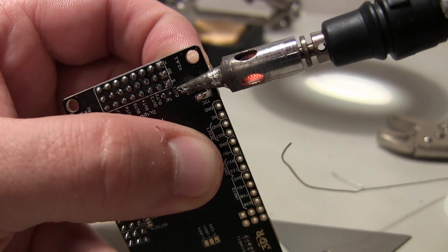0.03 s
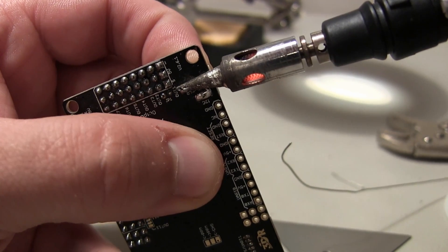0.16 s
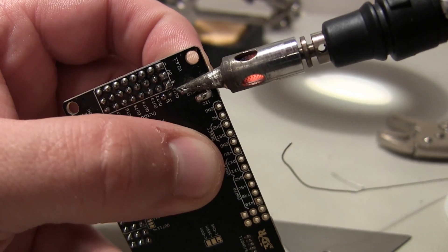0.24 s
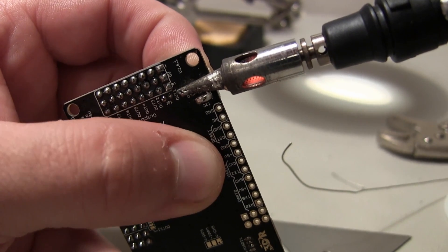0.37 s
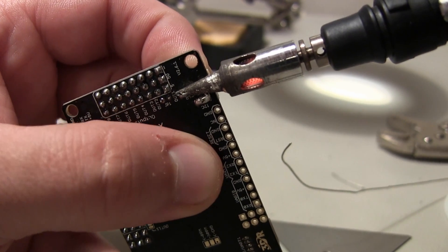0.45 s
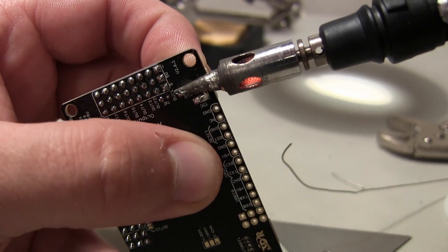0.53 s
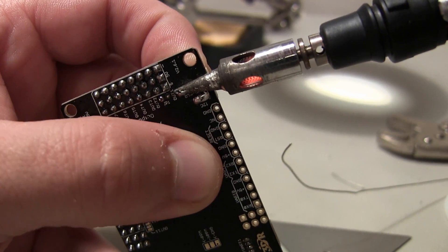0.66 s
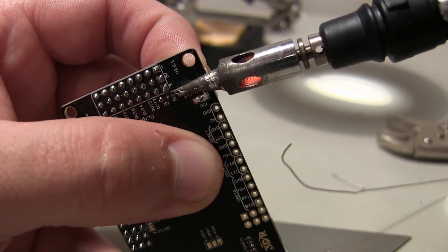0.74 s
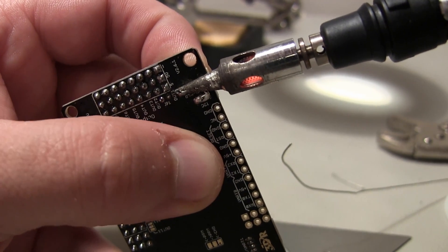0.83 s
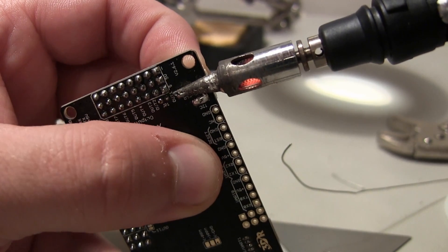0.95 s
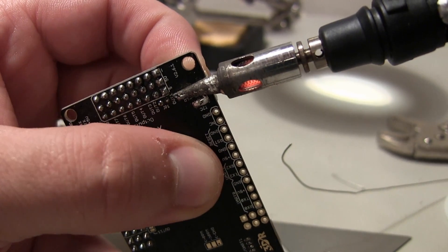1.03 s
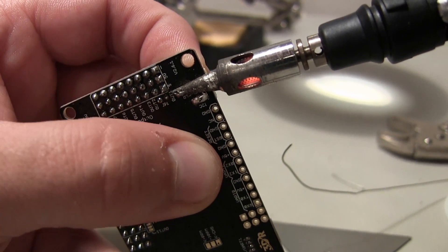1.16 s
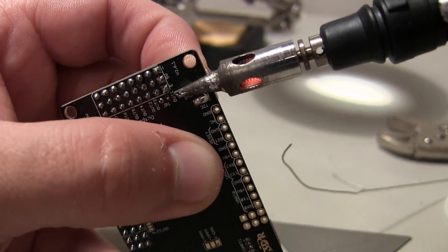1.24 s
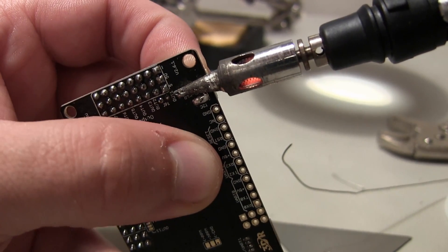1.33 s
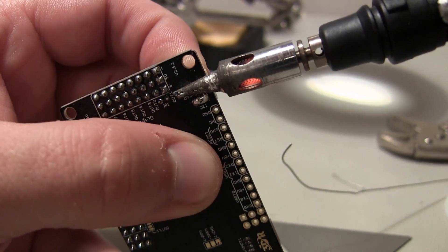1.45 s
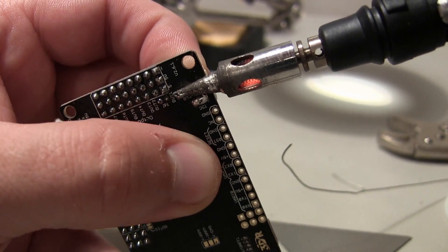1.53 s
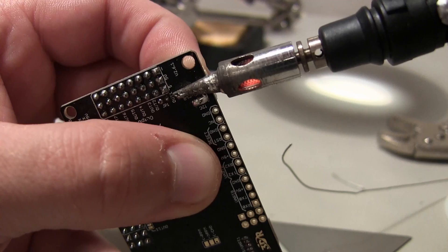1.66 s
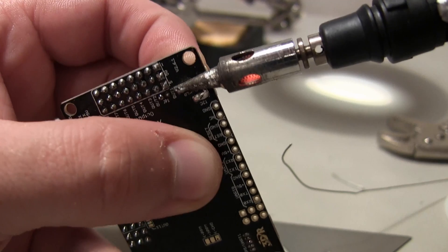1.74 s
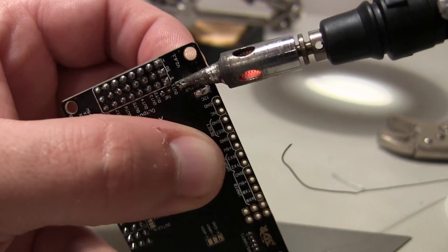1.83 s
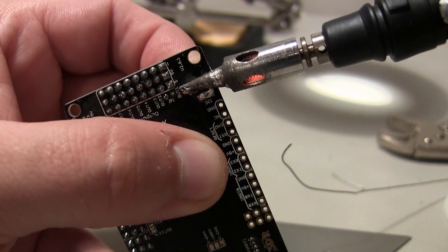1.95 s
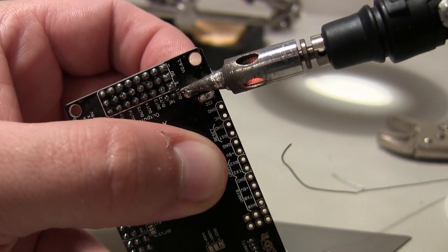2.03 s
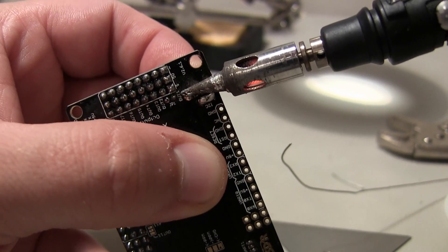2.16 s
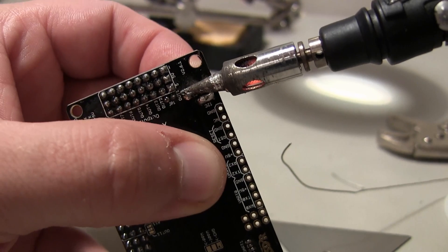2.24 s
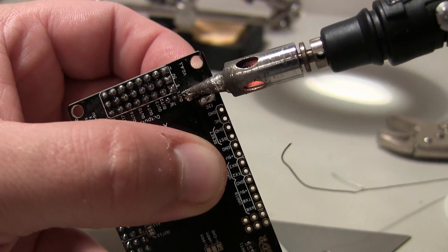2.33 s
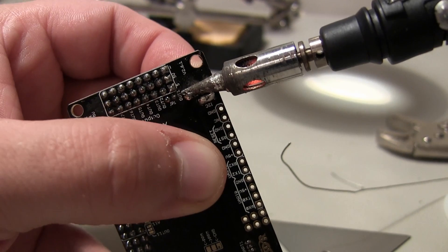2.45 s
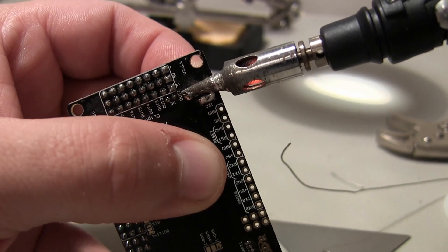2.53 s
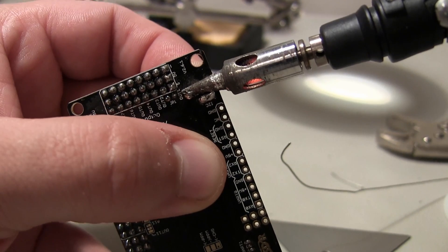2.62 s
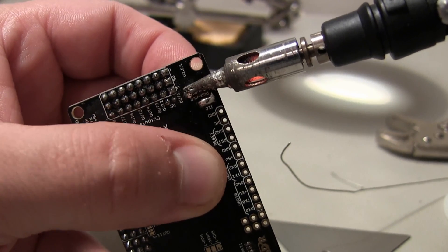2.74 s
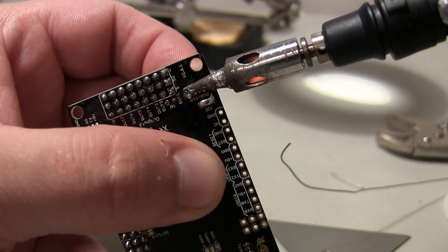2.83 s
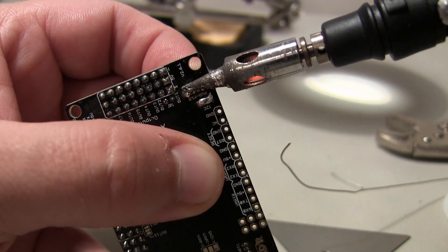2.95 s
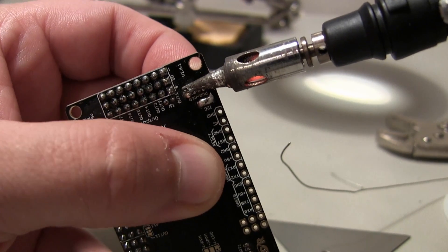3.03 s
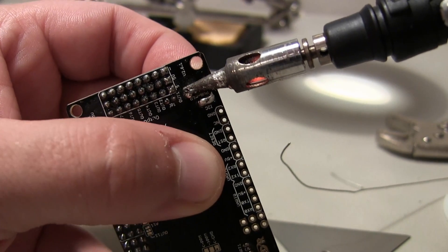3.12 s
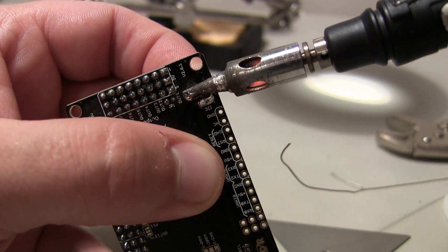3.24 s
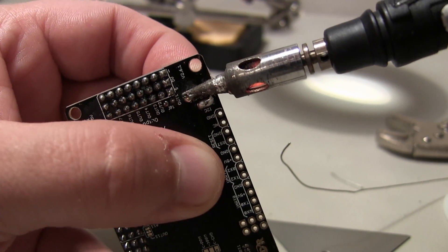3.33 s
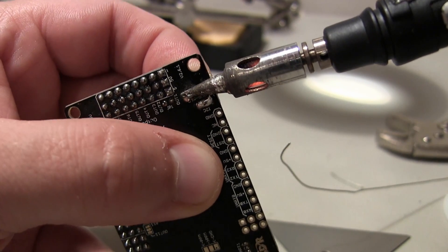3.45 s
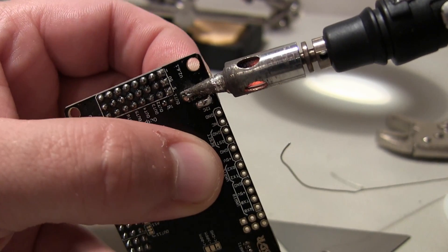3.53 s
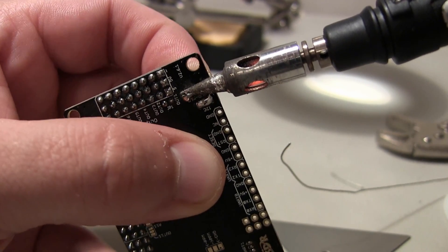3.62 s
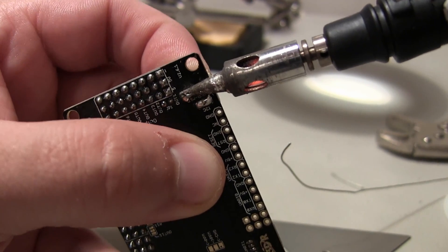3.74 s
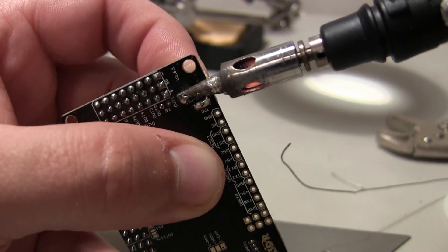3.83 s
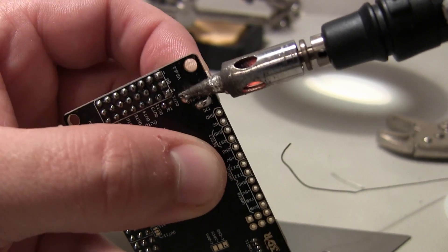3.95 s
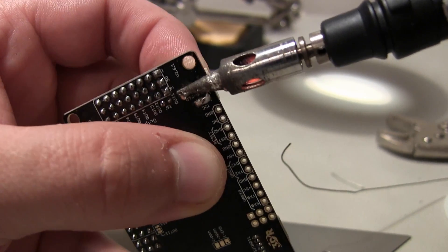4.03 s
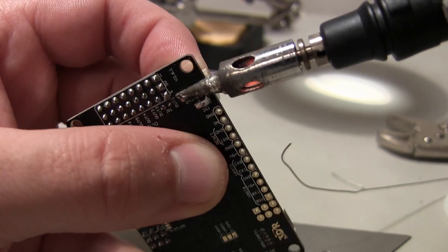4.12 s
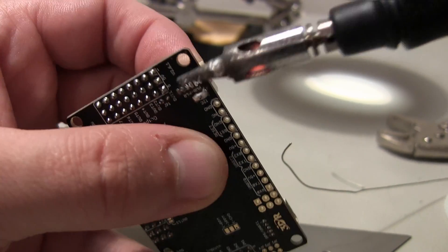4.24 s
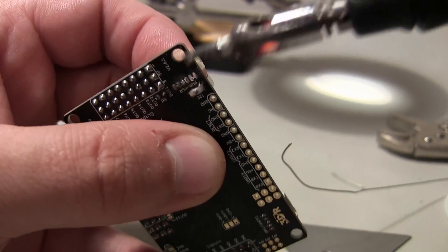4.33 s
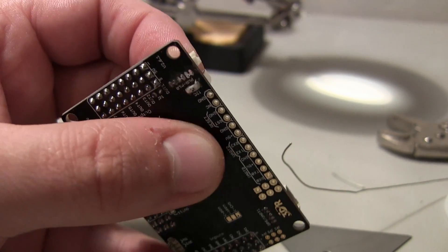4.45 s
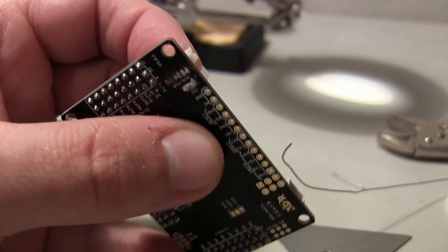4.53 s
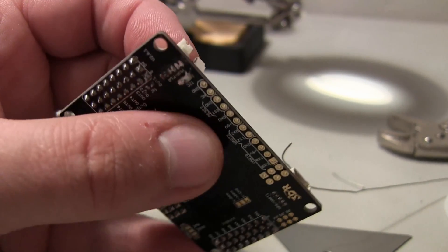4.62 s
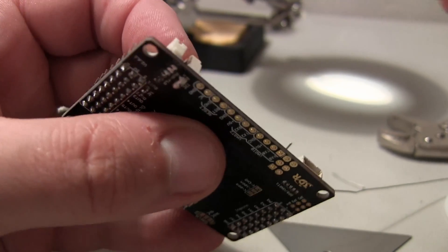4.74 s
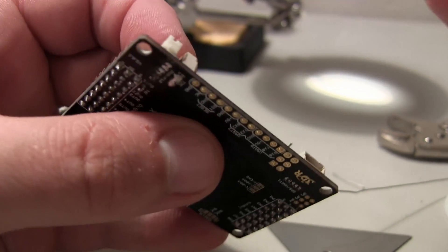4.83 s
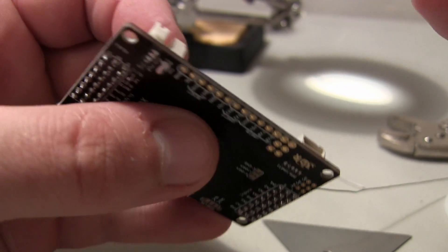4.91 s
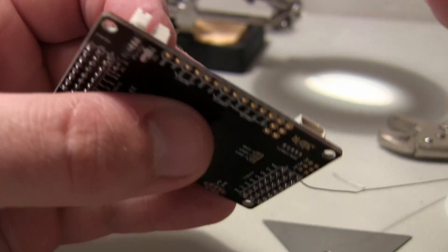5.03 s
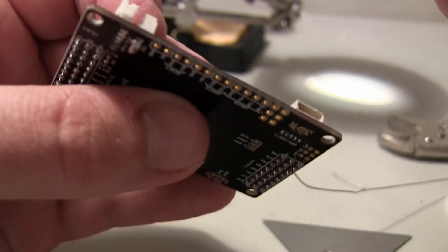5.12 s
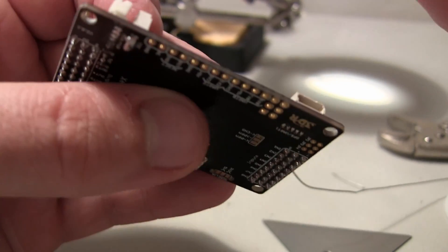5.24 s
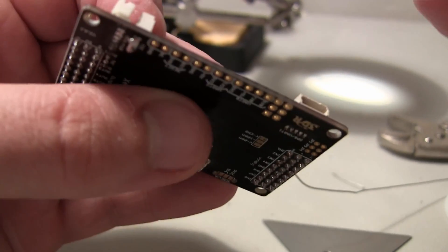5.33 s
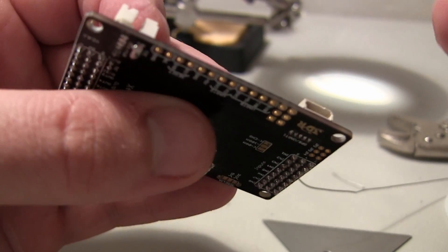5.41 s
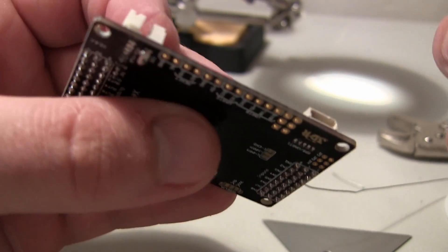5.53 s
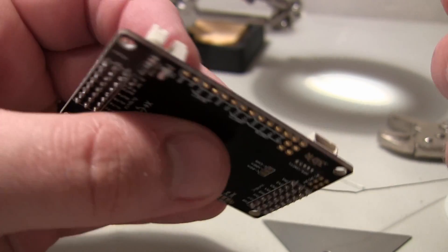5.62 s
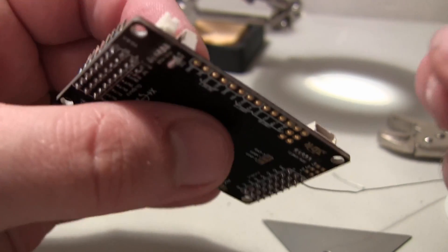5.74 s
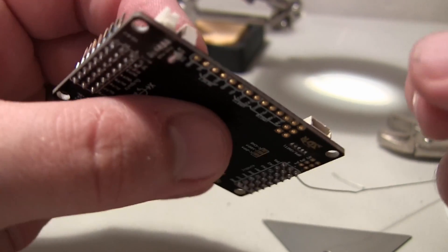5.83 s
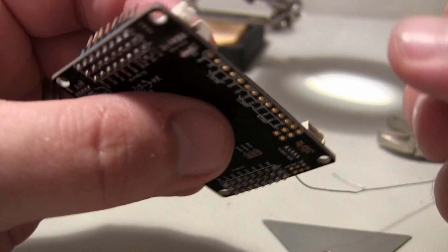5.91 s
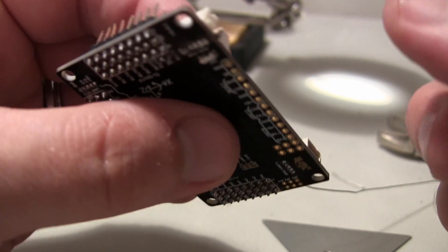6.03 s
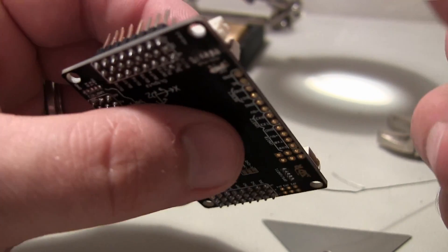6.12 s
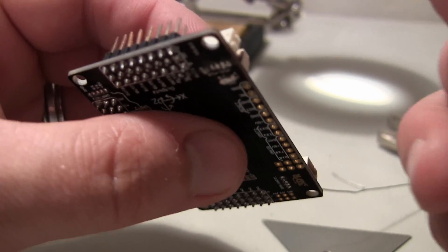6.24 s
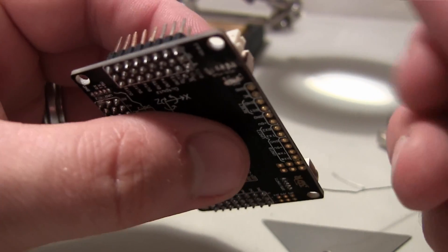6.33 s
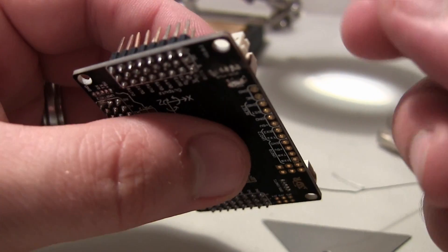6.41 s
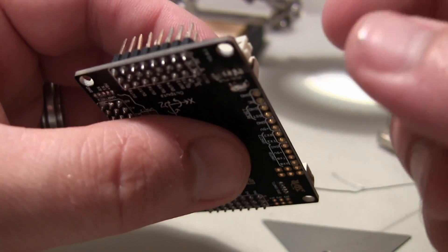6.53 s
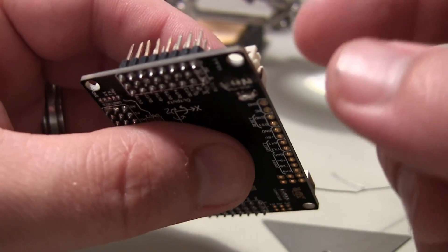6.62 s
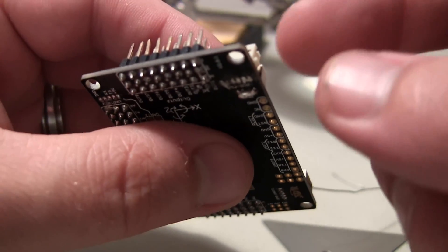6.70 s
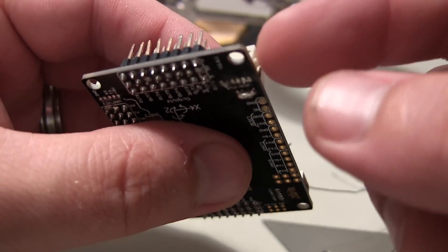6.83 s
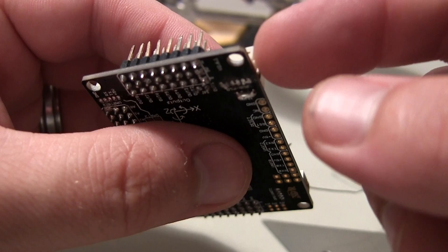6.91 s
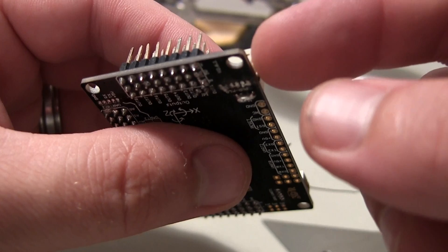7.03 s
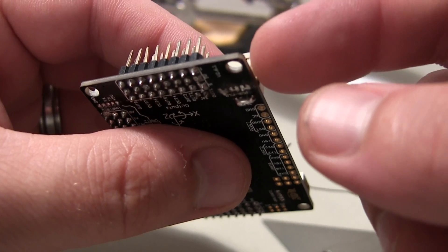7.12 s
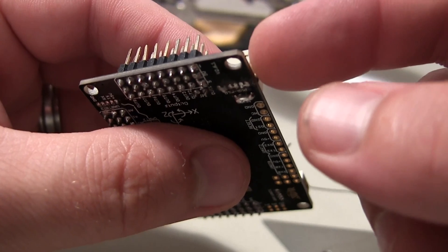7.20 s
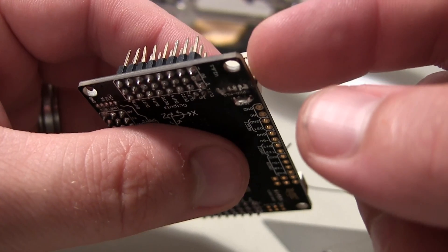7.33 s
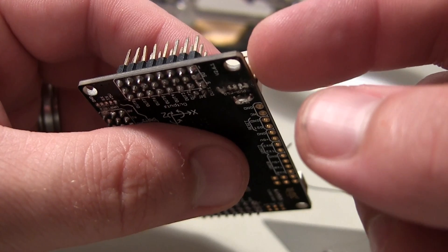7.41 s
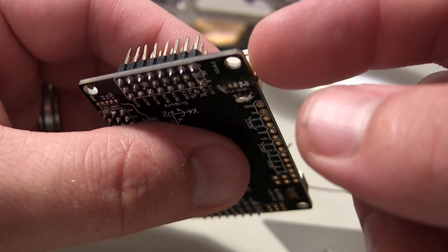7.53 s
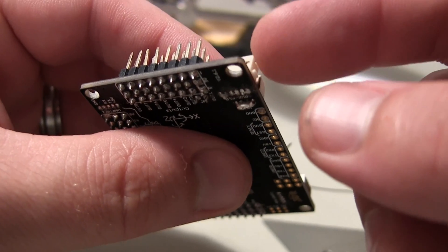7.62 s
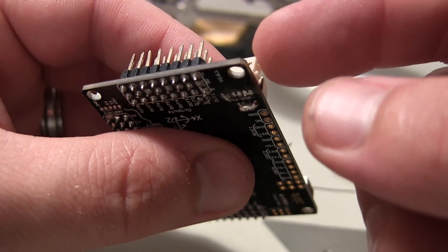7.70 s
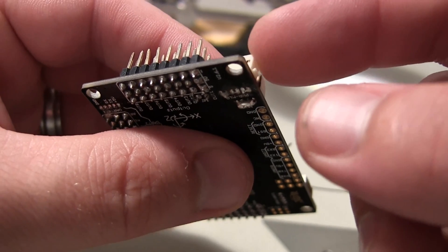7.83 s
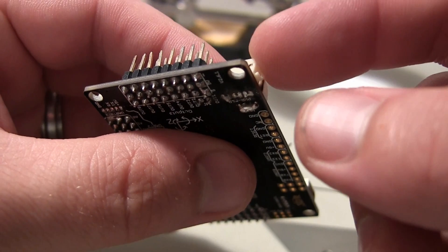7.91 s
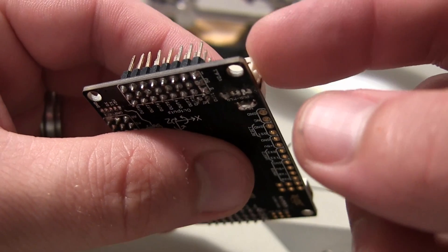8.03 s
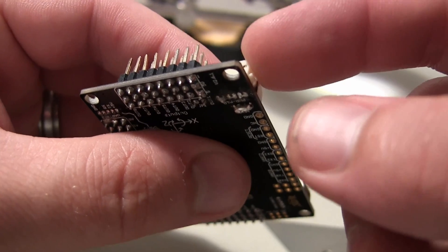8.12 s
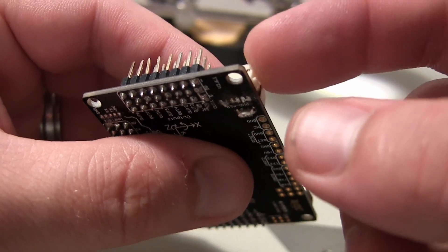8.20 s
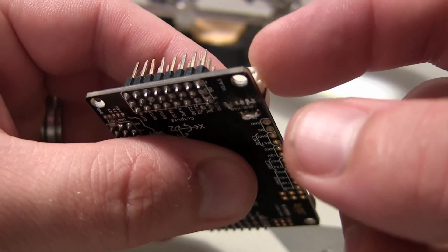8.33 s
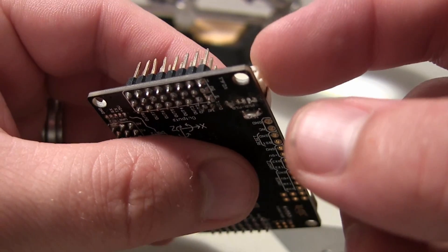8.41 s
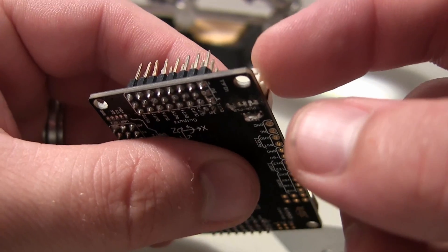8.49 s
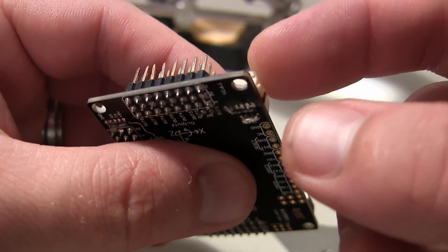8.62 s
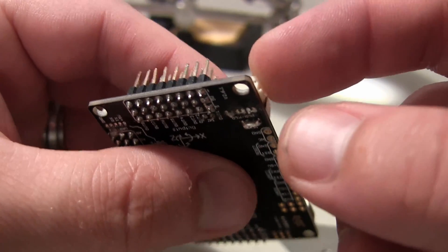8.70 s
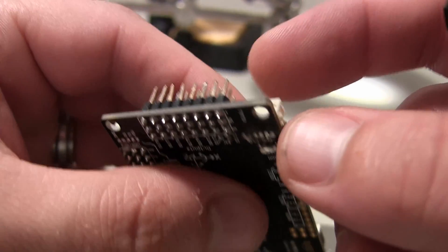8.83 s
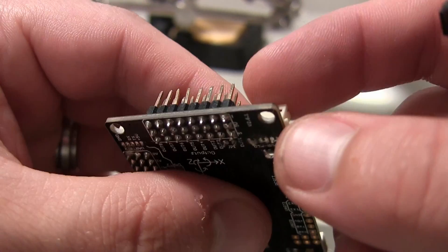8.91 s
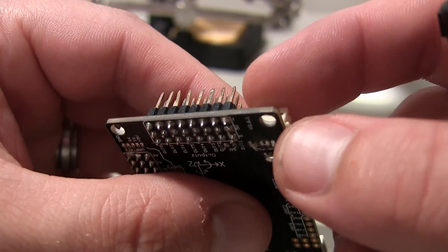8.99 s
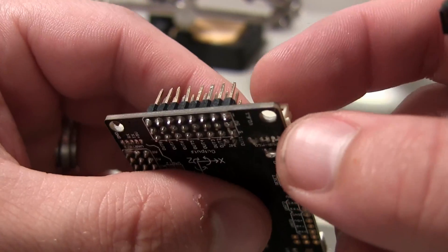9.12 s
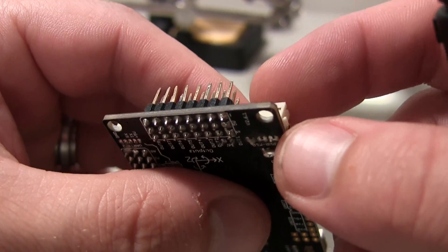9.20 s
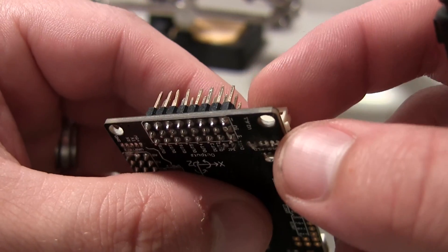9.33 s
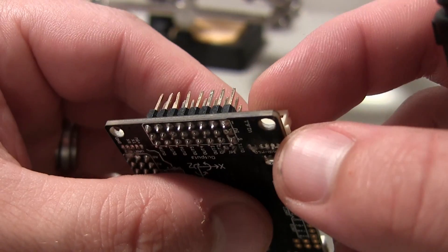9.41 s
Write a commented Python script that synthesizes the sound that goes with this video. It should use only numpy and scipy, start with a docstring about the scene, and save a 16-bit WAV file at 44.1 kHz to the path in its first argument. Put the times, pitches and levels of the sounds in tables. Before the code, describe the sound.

A gas soldering iron hisses steadily up close, then softens, with a few light clicks over a faint fan and electrical hum.

```python
"""Gas soldering iron at a bench

A gas jet hisses close by, coloured by the burner head's resonances and by echoes off nearby surfaces.
The iron heats a joint on a circuit board, is drawn away and is set down with a few light clicks; it
hisses on while fingers handle the board. A fan and mains hum fill the room; the hum swells near the end."""
import sys
import numpy as np
from scipy import signal
from scipy.fft import rfft, irfft, next_fast_len
from scipy.io import wavfile
from scipy.ndimage import map_coordinates

SR = 44100
rng = np.random.default_rng(int(sys.argv[2]) if len(sys.argv) > 2 else 0)


def store_wav(level_fs):
    """Save 16-bit WAV to argv[1]."""
    pcm = np.round(np.clip(np.atleast_2d(level_fs), -1, 1) * 32767)
    wavfile.write(sys.argv[1], SR, pcm.T.astype(np.int16))


N = 417186

# the iron is lifted off the joint, turned away and laid on the bench: (start [s], duration [s])
LIFT, TURN, LAY = (4.19, 0.45), (4.67, .2), (6.25, .58)


def amp(db):
    """The amplitude ratio of a level in decibels."""
    return 10 ** (np.asarray(db) / 20)


def unit(x):
    """Normalisation to an rms of 1."""
    return x / np.sqrt(np.mean(x ** 2) + 1e-20)


def along(points, hz):
    """A spectrum interpolated on a logarithmic frequency axis."""
    point_hz, point_db = np.transpose(points)
    return np.interp(np.log(hz + 1), np.log(point_hz + 1), point_db)


def humps(modes, hz):
    """Resonance: each mode adds a Lorentzian peak or dip, in dB."""
    return sum(db / (1 + (2 * (hz - centre) / width) ** 2) for centre, width, db in modes)


def wobble(rate):
    """Random modulation: a spline through rate knots a second."""
    return map_coordinates(rng.standard_normal(int(N * rate / SR) + 4), [np.arange(N) * rate / SR])


def filtered(x, response):
    """Linear filtering: the spectrum times a frequency response."""
    size = next_fast_len(N + SR // 2)
    return irfft(rfft(x, size) * response(np.fft.rfftfreq(size, 1 / SR)), size)[..., :N]


def panned(left_db):
    """Left and right gains for an interchannel level difference."""
    return amp(np.array([[.5], [-.5]]) * left_db)


def delayed(hz, ms):
    """A delay lags the phase in proportion to frequency."""
    phase = (2 * np.pi * hz * ms / 1000).astype(np.float32)
    return np.cos(phase) - 1j * np.sin(phase)


def eased(t, start, length):
    """A raised-cosine step from 0 to 1."""
    return np.sin(np.pi / 2 * np.clip((t - start) / length, 0, 1)) ** 2


def staged(values, t):
    """A glide through four poses: at the joint, lifted, in mid-air, on the bench."""
    steps = zip(np.diff(values), (LIFT, TURN, LAY))
    return values[0] + sum(step * eased(t, *move) for step, move in steps)


def travelled(t):
    """Uniform motion: the share of the way from joint to bench."""
    return np.clip((t - LIFT[0]) / (sum(LAY) - LIFT[0]), 0, 1)


def hand_shifts(t):
    """Small moves of the hands alter the sound paths, and so the level and the nearest echo."""
    # lasting changes: (start [s], duration [s], level [dB], echo strength [ratio], echo delay [ms])
    shifts = [(1.92, .15, -1, -.15, -0.0078), (3.4, 0.52, 0.85, 0.09, 0.0055), (8.72, 0.25, 1, -.09, -.012)]
    return sum(np.outer(changes, eased(t, start, length)) for start, length, *changes in shifts)


def clutter(hz, way, mean_ms=2.6, spread_ms=1.8, drift_ms=1.1, count=9):
    """Scattering: stray echoes of total power 1, whose paths grow or shrink along the iron's way."""
    total = 0
    for distance, direction, sign in rng.uniform(-1, 1, (count, 3)):
        ms = mean_ms + spread_ms * distance + drift_ms * direction * way
        total = total + np.sign(sign) * delayed(hz, ms)
    return total / np.sqrt(count)


def echoes(hz, t, surface_hz=6000, bass_share=0.44):
    """Comb filtering: echoes interfere with the direct sound, and the notches slide as the iron moves."""
    # echoes off board, hands and tools: (delay at joint [ms], delay on bench [ms], signed gain [ratio])
    far_echoes = [(0.508, 0.565, 0.093), (0.866, 0.681, 0.019), (.915, 1.02, -0.039), (1.1, 1, -0.0058),
                  (1.19, 1.681, -0.037), (1.46, 1.625, 0.037), (1.56, 1.53, -0.052), (2.657, 2, -0.11)]
    _, shift_strength, shift_ms = hand_shifts(t)
    way = travelled(t)
    nearest_ms = staged((0.2875, 0.368, 0.373, .427), t) + shift_ms
    strength = staged((0.46, 0.54, .16, 0.21), t) + shift_strength
    stray = staged((.06, .06, 0.26, .06), t) * clutter(hz, way, mean_ms=1.1, spread_ms=.6, drift_ms=0.69)
    # a small surface mirrors short waves best
    mirror = bass_share + (1 - bass_share) / (1 + (surface_hz / (hz + 1)) ** 4)
    paths = 1 + mirror * (strength * delayed(hz, nearest_ms) + stray)
    for joint_ms, bench_ms, gain in far_echoes:
        paths = paths + gain * delayed(hz, joint_ms + way * (bench_ms - joint_ms))
    return paths


def exhaust_port(hz, t, away, lying):
    """Directivity and resonance: the spectrum radiated by the port depends on the iron's pose."""
    # hiss with the port facing the listener, turned away, and on the bench: (frequency [Hz], level [dB])
    facing = [(200, -41), (780, -15.5), (1150, -20), (1450, -18), (1850, -23), (2150, -15), (3100, -16.5),
              (5000, -12.5), (7400, -14.5), (8900, -9.5), (11400, -3.5), (12400, -6), (13100, -2.5),
              (14700, -3), (15800, -15)]
    averted = [(200, -25), (700, -21), (1150, -18.5), (1800, -10), (2700, -9), (3900, -10.5), (5700, -7.5),
               (6700, -9.5), (8900, -7.5), (9900, -6.5), (11500, -2.5), (12700, 0), (14400, -4),
               (15800, -9.5)]
    resting = [(200, -23), (750, -22.5), (1050, -24.5), (1450, -10), (2600, -9.5), (3750, -14), (4500, -8),
               (6800, -9.5), (8100, -10.5), (10000, -9.5), (11600, -3), (13200, -3.5), (14600, -11.5),
               (15800, -11)]
    # resonances of the burner head, of the gap over the board and of the nook between iron and bench:
    # (frequency [Hz], width [Hz], gain [dB])
    head = [(805, 105, 5), (2103, 83, 3), (4300, 510, 2.5), (5960, 760, 2.5), (8420, 410, 4),
            (9080, 250, 2.5), (10530, 200, 1.5), (11440, 250, 2), (13250, 250, 2), (14100, 300, 0)]
    over_board = [(5700, 1100, 2.5), (7400, 1200, -0.5), (12900, 1200, 2)]
    nook = [(6300, 230, -4), (7600, 150, 5.5), (8170, 420, -6.5), (9010, 520, 8.5), (10900, 270, -7),
            (11780, 300, 4), (12400, 300, 1.5), (12950, 250, -2), (14700, 400, 7)]
    hovering = eased(t, *LIFT) - eased(t, *TURN)
    aside_db = (1 - lying) * along(averted, hz) + lying * (along(resting, hz) + humps(nook, hz))
    pose_db = (1 - away) * along(facing, hz) + away * aside_db
    return amp(pose_db + humps(head, hz) + hovering * humps(over_board, hz))


def burner(split_hz=7500, scatter_hz=5200, flutter_db=0.38, sputter_db=0.5):
    """Jet noise: gas rushes through the burner head; the treble beams, so turning away dims it most."""
    hz, t, jet = signal.stft(rng.standard_normal(N), SR, nperseg=1024)
    hz = hz[:, None]
    away = staged((.12, 0.49, 1, 1), t)  # how far the port is turned away, 0-1
    lying = 0.73 * eased(t, *LAY)  # how flat the iron lies, 0-1
    # each side gets its own scattered treble, more so with the port turned away
    scatter = (0.22 + 0.3 * away) / (1 + (scatter_hz / (hz + 1)) ** 8)
    sides = np.array([clutter(hz, travelled(t)) for _ in range(2)])
    colour = exhaust_port(hz, t, away, lying) * (echoes(hz, t) + scatter * sides)
    power = np.abs(colour) ** 2
    # both bands fade as the port turns away; the bench throws some of the sound back
    shift_db = hand_shifts(t)[0]
    body_db = -41.5 - 3 * away ** 1.5 + 3.5 * lying + shift_db
    treble_db = -25.5 - 10 * away ** 1.9 + 4.5 * lying + shift_db
    beam = 1 / (1 + (split_hz / (hz + 1)) ** 8)
    gain = 0
    for band_db, share in [(body_db, 1 - beam), (treble_db, beam)]:
        band_rms = np.sqrt(np.mean(share * power, axis=1, keepdims=True))
        gain = gain + share * amp(band_db) / band_rms
    place = panned(staged((-.15, -.1, -1, -.6), t))[:, None]
    hiss = signal.istft(jet * colour * gain * place, SR, nperseg=1024)[1][:, :N]
    return hiss * amp(flutter_db * wobble(22) + sputter_db * wobble(400))


def fan(air_db=-53.5, murmur_db=-57.0, pan_db=-2):
    """Airflow excites the fan housing's resonances; the room's diffuse field differs at each ear."""
    # spectra of the fan's direct sound and the room's murmur: (frequency [Hz], relative level [dB])
    air_spectrum = [(20, -28), (95, -28), (140, -6.5), (180, -12.5), (330, -2), (430, -4), (560, -8.5),
                    (850, -10), (1100, -20.5), (3000, -35), (15000, -40)]
    murmur_spectrum = [(20, -14), (45, -5), (80, -4), (130, 2), (240, 1.5), (370, 0.5), (600, -4),
                       (800, -7), (1200, -11.5), (2000, -41), (15000, -59)]
    # housing resonances: (frequency [Hz], width [Hz], gain [dB])
    housing = [(141, 16, 6.5), (214, 16, 12.7), (240, 9.8, 3.5), (299, 14, 4), (346, 45, 4.4),
               (382.3, 14, 7.5), (477, 32, 7.5), (802, 64, 7)]
    air = filtered(rng.standard_normal(N), lambda hz: amp(along(air_spectrum, hz) + humps(housing, hz)))
    murmur = filtered(rng.standard_normal((2, N)), lambda hz: amp(along(murmur_spectrum, hz)))
    return (amp(air_db) * unit(air) + amp(murmur_db) * unit(murmur)) * panned(pan_db)


def hum(waver_db=-1.2, surge_db=-53.5):
    """Superposition: motor and mains tones waver slightly; late on, a stronger mains tone adds in phase."""
    # hum tones: (frequency [Hz], level [dB], left minus right [dB], left phase lag [rad])
    lines = [(59.1, -61.5, 2.5, 0.47), (120.03, -63, -2.8, .25), (241, -74.5, -6, .05),
             (377, -70.5, -1.7, .13)]
    t = np.arange(N) / SR

    def tone(hz, pan, lag):
        return np.sqrt(2) * np.sin(2 * np.pi * hz * t - np.array([[lag], [0]])) * panned(pan)

    steady = sum(amp(db + waver_db * wobble(3)) * tone(hz, pan, lag) for hz, db, pan, lag in lines)
    mains_hz, _, pan, lag = lines[1]
    surge = amp(surge_db) * eased(t, start=8.63, length=.26) * tone(mains_hz, pan, lag)
    return steady + surge


def clicks(crack_db=-12, crack_t60=0.008, pan_db=-1):
    """Impacts excite damped modes: soft contacts knock the low ones, hard contacts tick the high ones."""
    # contacts of iron, bench and fingers:
    # (time [s], gain [dB], centre frequency [Hz], spread [octaves], rise time [ms])
    contacts = [(5.8244, -26, 700, 2.3, 0.39), (5.8304, -29, 400, .8, .6), (5.8903, -30, 2500, 0.66, 0.33),
                (5.892, -20, 4170, 0.1, 0.53), (5.904, -33.5, 1700, 1.3, .4), (6.208, -30, 4300, .8, .4),
                (6.2388, -28, 3500, 0.9, 0.61), (6.3342, -18.5, 4120, 0.19, 0.23),
                (6.568, -30.5, 4300, 0.65, .3), (8.655, -24, 276, .15, 9), (9.182, -24, 1130, 0.093, 5.1),
                (9.262, -17.5, 288, .1, 15)]
    # the modes they excite: (frequency [Hz], relative level [dB], time to decay by 60 dB [s])
    modes = [(289, -13, 0.11), (410, -1, 0.024), (1138, -6, 0.034), (1300, -0.5, 0.016), (1630, 0, 0.012),
             (2390, 3, 0.0064), (3670, 1, 0.0066), (4170, -0.5, 0.0091), (4600, 2.5, 0.0047)]
    out, t = np.zeros(N + SR), np.arange(SR // 6) / SR
    mode_hz, mode_db, t60 = np.transpose(modes)[:, :, None]
    for start, db, centre_hz, spread, rise_ms in contacts:
        share = np.exp(-.5 * (np.log2(mode_hz / centre_hz) / spread) ** 2)
        ring = np.sum(share * amp(mode_db - 60 * t / t60) * np.sin(2 * np.pi * mode_hz * t), axis=0)
        rise = 1 - np.exp(-1000 * t / rise_ms)
        crack = spread * amp(crack_db - 60 * t / crack_t60) * rng.standard_normal(len(t))
        out[round(start * SR):][:len(t)] += amp(db) * (ring * rise + crack)
    return out[:N] * panned(pan_db)


def scene():
    """Superposition: the sound pressures of the iron and the room add."""
    return burner() + clicks() + fan() + hum()


def record(dry, top_hz=15850):
    """Band limiting: an ideal low-pass filter removes the highest treble."""
    return filtered(dry, lambda hz: hz < top_hz)


dry = scene()
out = record(dry)
store_wav(out)
```